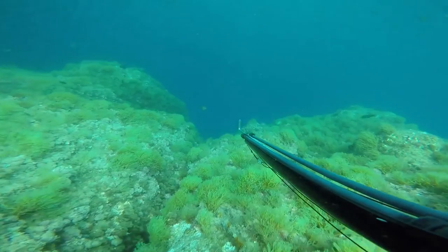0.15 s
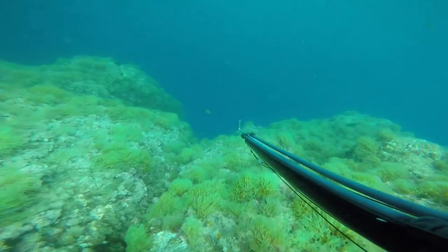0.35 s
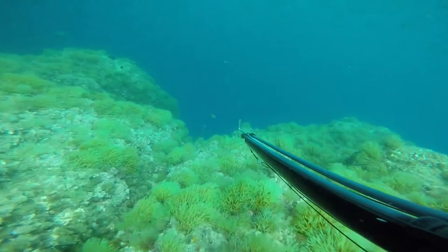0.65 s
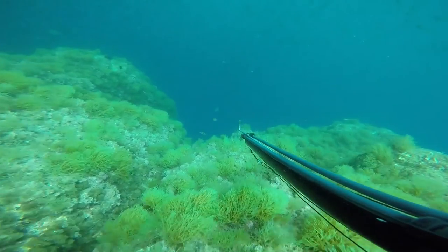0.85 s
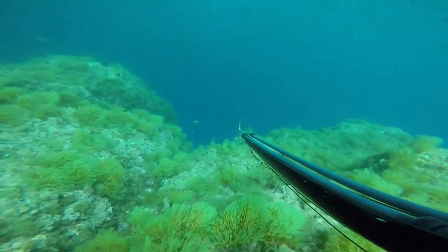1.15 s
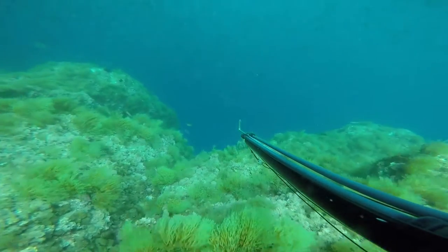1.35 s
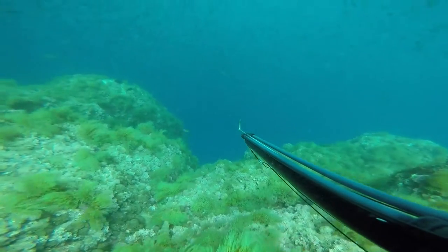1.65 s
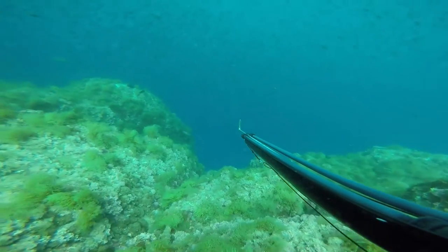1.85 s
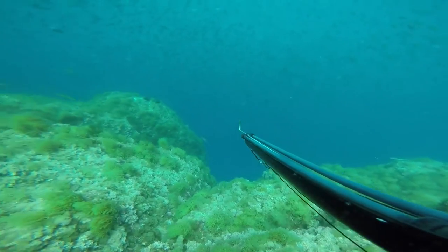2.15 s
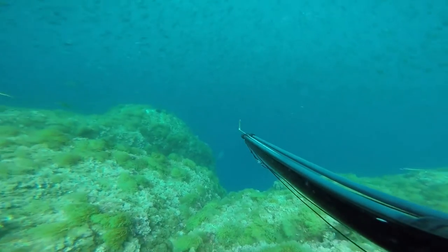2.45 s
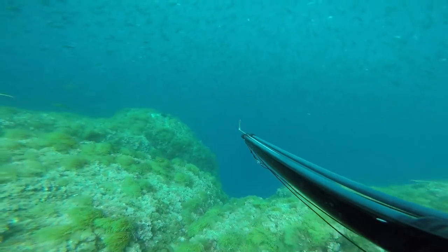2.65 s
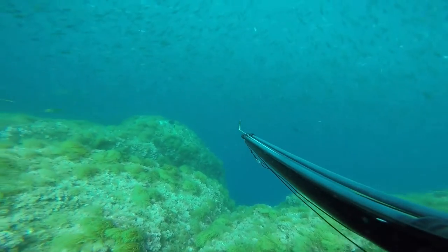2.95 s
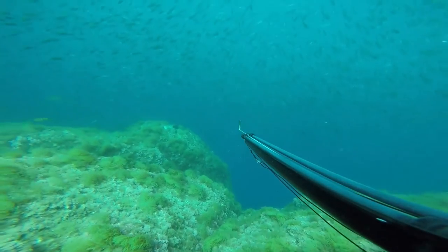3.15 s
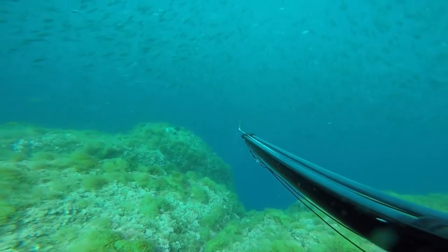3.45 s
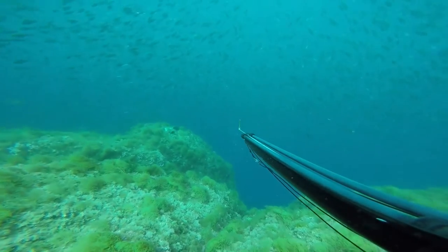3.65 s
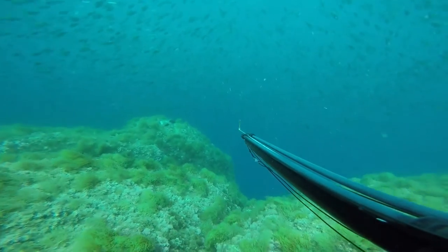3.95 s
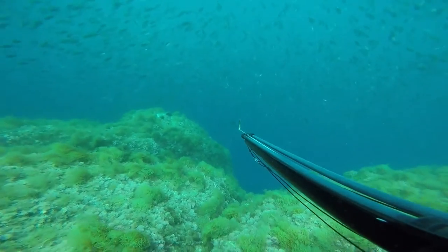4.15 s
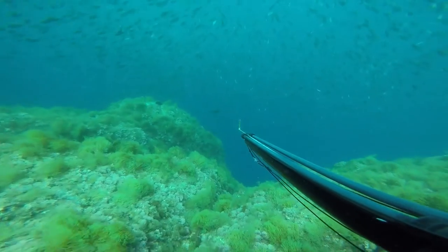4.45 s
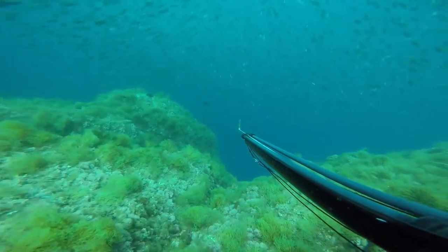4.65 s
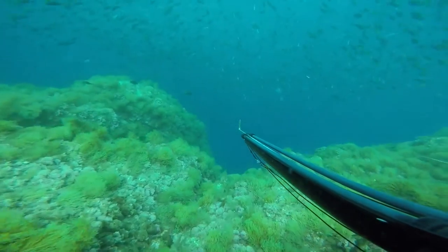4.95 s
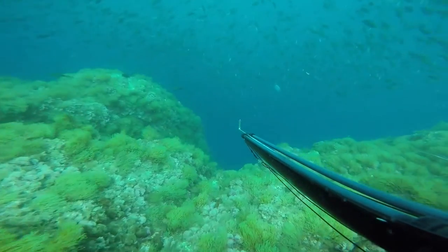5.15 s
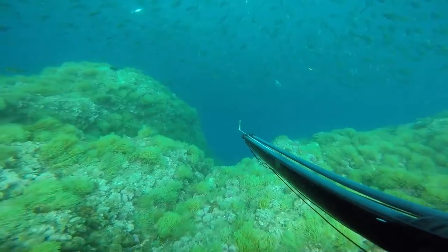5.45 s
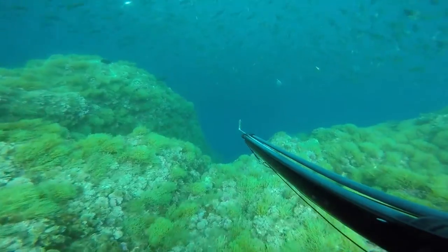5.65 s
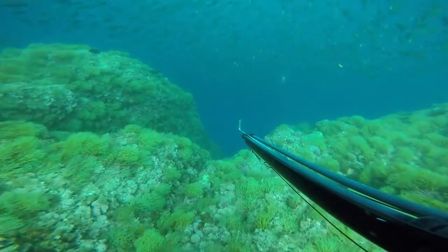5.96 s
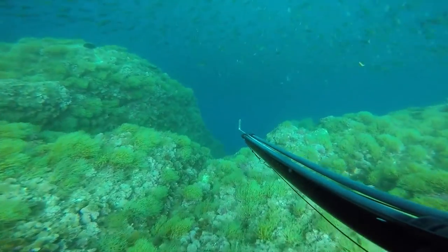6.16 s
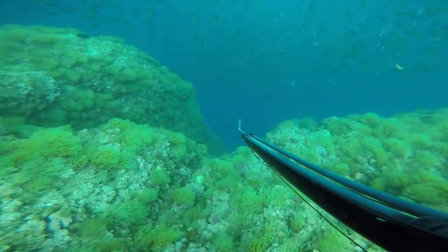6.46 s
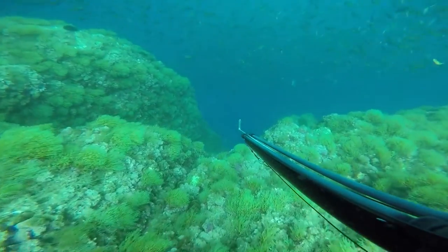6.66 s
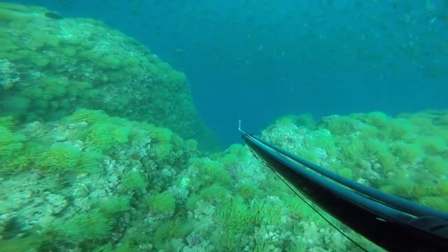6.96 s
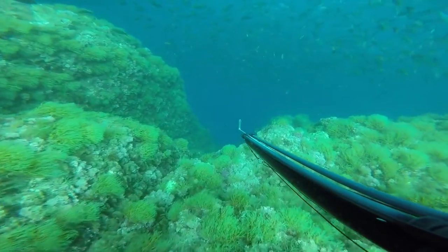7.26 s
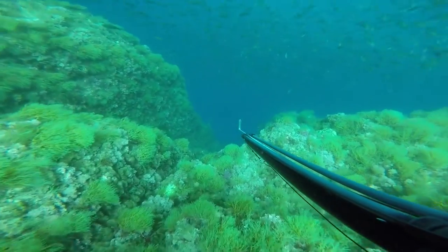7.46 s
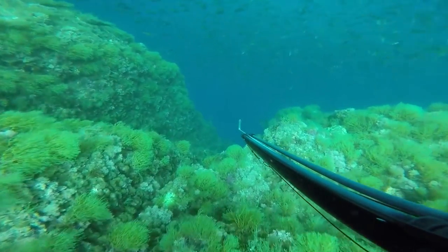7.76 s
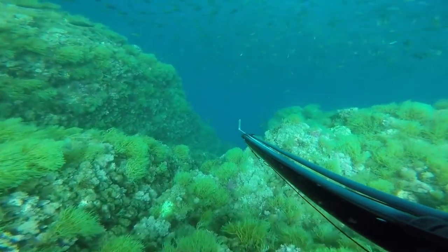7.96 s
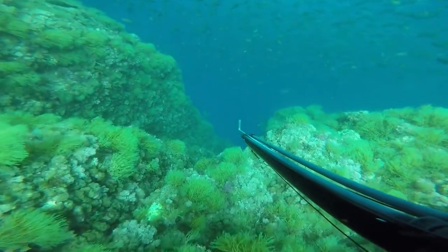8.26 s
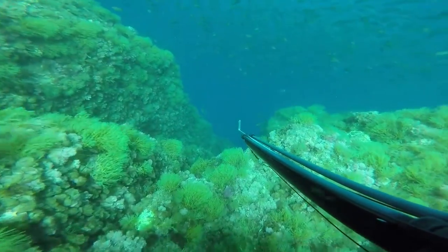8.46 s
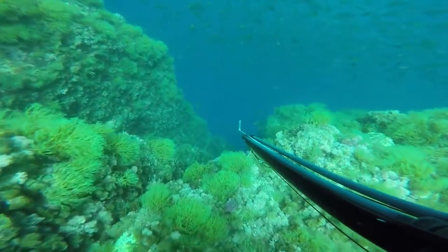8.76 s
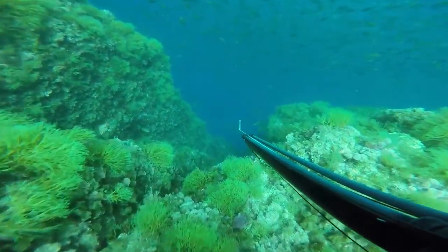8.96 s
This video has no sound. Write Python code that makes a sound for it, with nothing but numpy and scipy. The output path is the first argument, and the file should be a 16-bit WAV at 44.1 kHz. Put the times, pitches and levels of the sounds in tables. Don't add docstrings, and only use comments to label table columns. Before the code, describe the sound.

Steady crackling hiss of distant shrimp under the sea, one loud snap midway, muffled surging rumble, and a few dull bumps on the camera housing.

```python
import sys
import numpy as np
from scipy import signal
from scipy.fft import rfft, irfft, next_fast_len
from scipy.io import wavfile
from scipy.ndimage import uniform_filter1d, map_coordinates

SR = 44100
rng = np.random.default_rng(int(sys.argv[2]) if len(sys.argv) > 2 else 0)


def unload_wav(signal):
    wavfile.write(
        sys.argv[1],
        SR,
        np.round(np.clip(np.atleast_2d(signal).T, -1, 1) * 32767).astype(np.int16),
    )


def voltage_ratio(decibels):
    exponent = np.asarray(decibels, float) / 20
    return 10 ** exponent


N = 401310

# centre in Hz, width in Hz, level in dB.
HOUSING_MODES = [(800, 130, 5), (1755, 115, 5.5), (2197, 130, 5), (2490, 113, 2.5), (2972, 226, 7.5),
                 (3880, 570, 2), (4940, 620, 1.5), (5780, 390, 0), (7100, 500, -1.5), (10130, 950, -9),
                 (10900, 5100, -16.5)]
# frequency in Hz, density in dB per Hz.
HISS_SPECTRUM = [(240, -58), (400, -5), (759, -1.5), (1420, -8.5), (1680, -4.5), (2950, -4), (3280, -6),
                 (5900, -6.5), (6400, -8), (6900, -6), (8190, -12.5), (12400, -17.5), (15300, -20.5)]
# time in seconds, heave level in dB.
SURGE_LEVEL = [(0.0, -39), (0.53, -35.5), (1.24, -44.5), (1.37, -37.5), (3.75, -41), (4.16, -36.5),
               (4.43, -43), (4.59, -33), (4.87, -38.5), (5.02, -31.5), (6.31, -43.5), (6.56, -35.5),
               (7.15, -38.5), (7.2, -41.5), (7.5, -32.5), (7.63, -40), (9.02, -26.5), (9.1, -32)]
# frequency in Hz, density in dB per Hz.
HEAVE_SPECTRUM = [(3, -35), (6, 3), (29, -4.5), (45, -9), (60, -43), (200, -120)]
# frequency in Hz, density in dB per Hz.
EDDY_SPECTRUM = [(25, -9), (50, 6), (80, -2), (125, -10.5), (250, -21), (330, -19.5), (500, -31),
                 (900, -40.5), (1500, -120)]
# time in seconds, peak in dB at 2.6-4 kHz, body below that in dB relative to it,
# edge above 6.5 kHz in dB relative to it.
NEAR_SNAPS = [(0.089, -45, -10, -6), (0.2199, -32.5, -19, -7.5), (0.3665, -45, -12, 1),
              (0.5485, -27.5, -11, -14.5), (0.5734, -34.5, -0.5, -6), (0.5922, -41, -14, -8),
              (2.199, -40, -30, -12), (2.3058, -40, -12, -5), (2.4682, -40.5, -28, -5),
              (2.7544, -37, -14, -14), (3.045, -34.5, -6.5, -6), (3.205, -35.5, -29, -5),
              (3.3158, -30, -5.5, -6.5), (3.5507, -11, -1.5, -11), (4.244, -40, -20, -24),
              (4.2575, -35, -15, -19), (4.3222, -41, -2, -1), (5.3259, -42.5, -6, 1),
              (5.7136, -37, -14, -13), (5.875, -43, -2.5, 8), (6.0693, -40, -8, -15),
              (6.472, -38, -3.5, -10), (6.4782, -34.5, -12, -37), (6.8748, -36, -17, -5),
              (8.03, -38.5, -1, -8), (8.6482, -41.5, -13, -4), (8.879, -37.5, -19, -13),
              (8.9967, -42.5, 2, -34), (9.0777, -37.5, 3, -7), (9.0858, -39, -6, -14.5)]
# time in seconds, peak in dB, centre in Hz.
LARGE_CLAWS = [(0.2887, -43.5, 2960), (0.8051, -37, 2840), (1.044, -62, 1750), (1.14, -37, 2840),
               (1.2917, -43.5, 3020), (1.51, -41.5, 3040), (1.5835, -42, 3250), (1.651, -39.5, 2940),
               (2.8514, -43.5, 3770), (3.126, -47, 3870), (3.402, -37, 1800), (3.8935, -44, 3060),
               (3.9759, -52, 3660), (4.4327, -41.5, 3160), (4.7038, -38.5, 3870), (4.848, -43, 2800),
               (4.8663, -44, 3020), (5.029, -45, 1900), (5.7417, -47, 4850), (6.0783, -39, 3120),
               (6.093, -43.5, 3040), (7.0693, -40.5, 2940), (7.1763, -47, 3120), (7.3108, -42.5, 3200),
               (7.632, -39.5, 2740), (7.8238, -42.5, 4380), (7.9197, -44, 3860), (8.4919, -44, 2900),
               (8.7279, -44.5, 3090), (8.9918, -33.5, 5600)]
# time in seconds, peak in dB, centre in Hz.
SMALL_CLAWS = [(0.631, -55, 4970), (0.671, -40, 6600), (0.7226, -40.5, 3890), (1.3293, -38.5, 5060),
               (1.3553, -44, 5600), (1.4284, -37.5, 5450), (1.6776, -35.5, 4960), (1.712, -48, 3830),
               (2.162, -44.5, 10900), (2.285, -45, 4990), (2.617, -42, 5000), (2.7715, -48, 3550),
               (3.1198, -41.5, 3840), (3.8186, -43, 4000), (4.3492, -46.5, 4870), (4.4118, -47, 4140),
               (4.758, -49, 7140), (4.813, -56, 3790), (4.9817, -40, 5850), (5.066, -42, 6130),
               (5.2132, -42, 3860), (5.663, -41.5, 6560), (5.7506, -41, 4800), (5.8092, -42, 5660),
               (6.0223, -47, 4550), (6.9386, -34.5, 5650), (7.1073, -46, 4810), (7.9903, -46, 6200),
               (8.1684, -55, 4870), (8.3533, -47, 6600)]
# time in seconds, peak in dB, ring in Hz.
RIG_THUDS = [
    (0.477, -29, 80.7),
    (0.49, -28, 79),
    (0.506, -48, 80.7),
    (1.873, -37.5, 80.7),
    (4.622, -48, 80.7),
    (4.851, -36, 138),
    (4.859, -41, 103),
    (4.954, -37, 119),
    (6.967, -36, 126),
    (7.722, -50, 86.1),
]
# start in seconds, length in seconds, level in dB,
# sharpness in dB (less frame and more bright ring).
GLOVE_STROKES = [(0.731, 0.012, -54, 3.5), (1.037, 0.0077, -54, 12), (1.305, 0.066, -60.5, 6.5),
                 (1.705, 0.033, -54.5, -9), (1.748, 0.026, -47.5, -1), (1.855, 0.0078, -33, -4),
                 (1.906, 0.059, -64, -10), (4.271, 0.018, -55, 5), (4.588, 0.23, -71.5, -10),
                 (6.814, 0.51, -68.5, 4), (7.307, 0.46, -65, -1.5), (8.251, 0.094, -60.5, 7),
                 (8.364, 0.017, -57, 5), (8.455, 0.068, -62.5, -3)]
# start in seconds, level in dB, hold in seconds, release in dB per second,
# bright ring in dB relative to the shell.
HARD_GRIPS = [
    (1.764, -29, 0.0333, 2505, -11),
    (1.808, -29.5, 0.0023, 470, -6),
]
# centre in Hz, width in Hz, level in dB.
FRAME_MODES = [(286, 100, 18), (245, 50, -16), (131, 260, -9)]
# centre in Hz, width in Hz, level in dB.
SHELL_MODES = [(776, 98, 4), (620, 530, -11), (920, 86, -11)]
# centre in Hz, width in Hz, level in dB.
BRIGHT_MODES = [(1730, 230, 3.5), (2380, 67, -43), (2700, 150, -10.5)]


def unit(x):
    return x / np.sqrt(np.mean(x ** 2) + 1e-20)


def curves(rows):
    s, *cols = np.transpose(rows)
    return [np.interp(np.arange(N) / SR, s, c) for c in cols]


def wobble(rate):
    knots = rng.standard_normal(int(N * rate / SR) + 4)
    return map_coordinates(knots, [np.arange(N) * rate / SR])


def filtered(x, response):
    m = next_fast_len(N + SR // 2)
    return irfft(rfft(x, m) * response(np.fft.rfftfreq(m, 1 / SR)), m)[..., :N]


def noise(spectrum):
    hz, db = np.transpose(spectrum)

    def colour(f):
        return voltage_ratio(np.interp(np.log(f + 1), np.log(hz + 1), db, right=-120))

    return unit(filtered(rng.standard_normal(N), colour))


def resonances(modes, f):
    return sum((-1) ** k * voltage_ratio(db) * 1j * f * w / (c * c - f * f + 1j * f * w)
               for k, (c, w, db) in enumerate(modes))


def band(f, low_hz, high_hz):
    s = 1j * (f * f - low_hz * high_hz) / ((f + 1e-9) * (high_hz - low_hz))
    return 1 / ((s + 1) * (s * s + s + 1))


def ticks(rate, spread_db):
    chance, size = rng.random((2, N))
    sizes = voltage_ratio(-spread_db * np.log(size + 0.014))
    return unit((chance < rate / SR) * sizes * np.sign(rng.standard_normal(N)))


def colony():
    level_db = -66 + 0.39 * wobble(2.647)
    t = np.arange(600) / SR
    crackle = 0
    for low_hz, high_hz, db in [(1500, 3140, -9.5), (2040, 5300, -3.5), (3300, 24000, -4.5), (5520, 24000, -1.5)]:
        path = rng.standard_normal(len(t)) * voltage_ratio(-60 * t / 0.038)
        far = signal.fftconvolve(ticks(rate=90, spread_db=9.0), path)[:N]
        inside = filtered(far, lambda f: resonances(HOUSING_MODES, f) * band(f, low_hz, high_hz))
        crackle = crackle + voltage_ratio(db) * unit(inside)
    hiss = voltage_ratio(2 + 0.9 * wobble(5.3)) * noise(HISS_SPECTRUM)
    return voltage_ratio(level_db) * (crackle + hiss)


def surge():
    eddy_memory_s = 1.15
    heave_db, = curves(SURGE_LEVEL)
    swell_db = uniform_filter1d(heave_db - heave_db.mean(), int(eddy_memory_s * SR))
    eddy_db = -55 + 0.7 * swell_db + 1.5 + 1.8 * wobble(16)
    heave = noise(HEAVE_SPECTRUM)
    heave /= np.sqrt(np.abs(uniform_filter1d(heave ** 2, int(.2 * SR))) + 0.057)
    heave *= np.clip((N - np.arange(N)) / 900, 0, 1)
    return voltage_ratio(heave_db) * unit(heave) + voltage_ratio(eddy_db) * noise(EDDY_SPECTRUM)


def bursts(dbs):
    t = np.arange(2048) / SR
    draw = rng.standard_normal((len(dbs), 3, len(t)))
    near_db = dbs[:, None] + 27
    depth_db = 3 * draw[:, 0, -1:] - 0.23 * near_db
    rise_s = 0.00033 * voltage_ratio(5.6 * draw[:, 1, -1:] - 0.33 * near_db)
    crack = draw[:, 0] * t / rise_s * np.exp(1 - t / rise_s)
    crack[:, 24] += 9 * voltage_ratio(0.18 * near_db[:, 0])
    early = voltage_ratio(-13.5 - 60 * t / 0.057) * draw[:, 1]
    late = voltage_ratio(-33.5 - 60 * t / 0.17) * draw[:, 2]
    rock_faces = voltage_ratio(5 * np.repeat(draw[:, 2, ::64], 64, axis=1))
    scatter = (early + late) * rock_faces
    return crack + voltage_ratio(depth_db) * scatter * (1 - np.exp(-t / 0.00018))


def heard(waves, times, dbs, bands):
    out, size = np.zeros(N + SR), waves.shape[1]
    f = np.fft.rfftfreq(size, 1 / SR)
    side_db = 4.3 * rng.standard_normal((len(HOUSING_MODES), len(times)))
    lean_db = np.clip(-dbs / 40, 0, 1) * side_db
    modes = [(c, w, g + d[:, None]) for (c, w, g), d in zip(HOUSING_MODES, lean_db)]
    low_hz, high_hz = np.transpose(bands)[..., None]
    clicks = irfft(rfft(waves) * resonances(modes, f) * band(f, low_hz, high_hz), size)
    peaks = np.sqrt(2 * uniform_filter1d(clicks ** 2, size=80).max(1))
    for click, s, gain in zip(clicks, times, voltage_ratio(dbs) / peaks):
        out[round(s * SR):][:size] += gain * click
    return out[:N]


def near_snaps():
    s, db, low_db, high_db = np.transpose(NEAR_SNAPS)
    mid_db = 2 + 0.38 * high_db + 0.11 * (db + 41)
    waves = bursts(db)
    top_hz = np.clip(8200 * 2 ** ((high_db - np.maximum(mid_db, 0) + 11.5) / 18), 7500, 16000)
    parts = [(low_db - 16, 600, 1150), (low_db - .3, 1640, 2600), (-.3, 2600, 4000), (mid_db - .3, 4000, 6500),
             (high_db - .3, 6500, top_hz), (high_db - 9 - 0.1 * (db + 47), 8800, 11600)]
    out = 0
    for rel_db, low_hz, high_hz in parts:
        edges = np.transpose([low_hz + 0 * s, high_hz + 0 * s])
        out = out + heard(waves, s - .0004, db + rel_db, edges)
    return out


def echoes():
    s, db = np.transpose(NEAR_SNAPS)[:2]
    delay, level, tone = rng.standard_normal((3, len(s)))
    echo_db = np.minimum(db - 14 + 3 * level, -40)
    return np.transpose([s + 0.012 + 0.0039 * delay, echo_db, 5000 * 2 ** (0.13 * tone)])


def strays():
    early_share, lead_s, answer_s, loners = .35, 0.012, .05, 45
    called = np.concatenate([np.transpose(rows)[0] for rows in (NEAR_SNAPS, LARGE_CLAWS, SMALL_CLAWS)])
    early = rng.random(len(called)) < early_share
    waits = rng.exponential(size=len(called)) * np.where(early, -lead_s, answer_s)
    s = np.concatenate([called + waits, N / SR * rng.random(loners)])
    level, tone = rng.standard_normal((2, len(s)))
    return np.transpose([np.clip(s, .01, N / SR), -50.5 + 3 * level, 5140 * 2 ** (0.22 * tone)])


def lesser_snaps():
    out = 0
    for rows, low, high in [(LARGE_CLAWS, .62, 2.1), (SMALL_CLAWS, .5, 1.7), (echoes(), .6, 1.6),
                            (strays(), .58, 1.6)]:
        s, db, hz = np.transpose(rows)
        waves = bursts(db)
        tip_db = np.minimum(-21.5 + 9.5 * rng.standard_normal(len(s)), -9)
        edges = np.clip(np.outer(hz, [low, high]), 1400, 16000)
        out = out + heard(waves, s - .0012, db - 0.5, edges)
        out = out + heard(waves, s - .0012, db + tip_db, [(7800, 12200)] * len(s))
    return out


def thuds():
    out, t = np.zeros(N + SR), np.arange(3000) / SR
    for s, db, ring_hz in RIG_THUDS:
        push = (t / 0.0015 * np.exp(1 - t / 0.001)) ** 2
        rock = np.sin(2 * np.pi * ring_hz * t) * voltage_ratio(2 - 60 * t / 0.041)
        rumble = unit(uniform_filter1d(rng.standard_normal(len(t)), size=60))
        shudder = rumble * voltage_ratio(-13.0 - 60 * t / 0.066)
        thud = push + (rock + shudder) * (1 - np.exp(-t / 0.0044))
        out[round((s + .0015) * SR):][:len(t)] += voltage_ratio(db + 6.5) * thud
    return filtered(out[:N], lambda f: band(f, 25, 620))


def glove_slips():
    gap, size_db = rng.standard_normal((2, 6000))
    slips = 0.075 * rng.standard_normal(N)
    at = np.cumsum(.0032 * np.exp(.45 * gap)) * SR
    kicks = voltage_ratio(4.8 * size_db) * np.sign(gap[::-1])
    slips[at[at < N].astype(int)] += kicks[at < N]
    return slips


def glove_force():
    frame_db, bright_db = -5.5, -6.5
    force = np.zeros((3, N))
    for s, length, db, sharp_db in GLOVE_STROKES:
        dbs = np.array([db + frame_db - sharp_db, db, db + bright_db + sharp_db])
        size = round(length * SR)
        force[:, round(s * SR):][:, :size] += voltage_ratio(dbs)[:, None] * signal.windows.tukey(size, .45)
    attack_s, bright_lag_s = 0.0089, 0.0061
    for s, db, hold, release, grip_bright_db in HARD_GRIPS:
        t = np.arange(N) / SR - s
        rise = np.clip((t - np.array([[0], [0], [bright_lag_s]])) / attack_s, 0, 1)
        fall_db = release * np.clip(t - attack_s - hold, 0, 1)
        force += voltage_ratio(db + np.array([[1], [0], [grip_bright_db]]) - fall_db) * rise
    return force


def scrape():
    slips, out = glove_slips(), 0
    bodies = [(FRAME_MODES, 70, 554), (SHELL_MODES, 480, 1130), (BRIGHT_MODES, 1620, 3500)]
    for push, (modes, low_hz, high_hz) in zip(glove_force(), bodies):
        both = np.array([push * slips, slips])
        rung, steady = filtered(both, lambda f: resonances(modes, f) * band(f, low_hz, high_hz))
        out = out + rung / steady.std()
    return out


def scene():
    return (colony() + surge() + near_snaps() + lesser_snaps() + thuds() + scrape())[None]


def band_limit(x):
    return signal.sosfilt(signal.butter(12, 16530, fs=SR, output="sos"), x)


def record(dry):
    edges_hz = [12900, 13800, 14600, 15350, 17500]
    soft = dry * signal.windows.tukey(N, .002)
    parts = filtered(soft, lambda f: np.array([(f >= a) & (f < b) for a, b in zip(edges_hz, edges_hz[1:])]))
    shared = wobble(15)
    gone = np.array([shared + wobble(45) for _ in range(3)]) > 1.2
    lost = uniform_filter1d(1. * gone, size=300)
    mix = dry - (lost * parts[:3]).sum(0) - 0.78 * parts[3]
    return band_limit(mix)


dry = scene()
out = record(dry)
unload_wav(out)
```